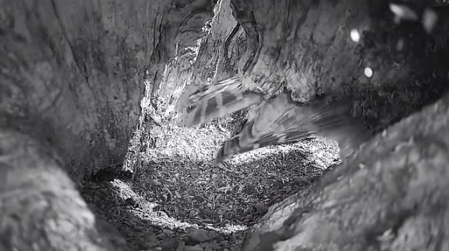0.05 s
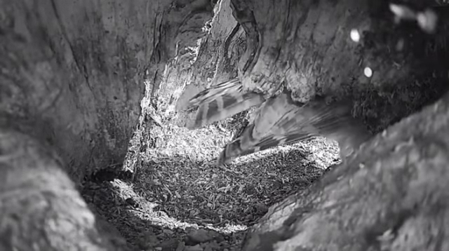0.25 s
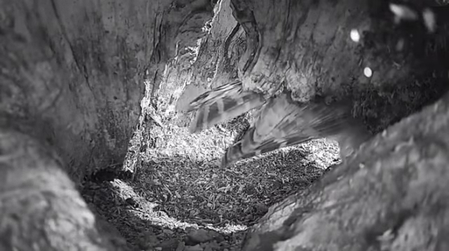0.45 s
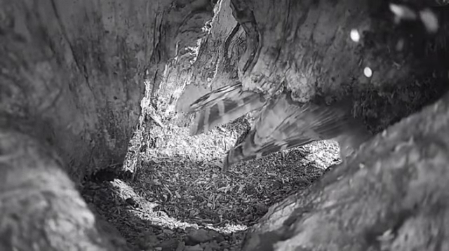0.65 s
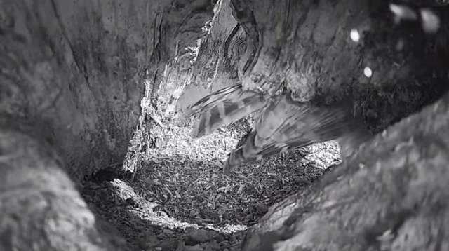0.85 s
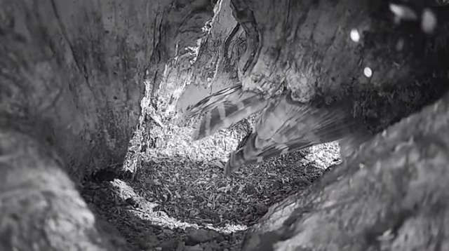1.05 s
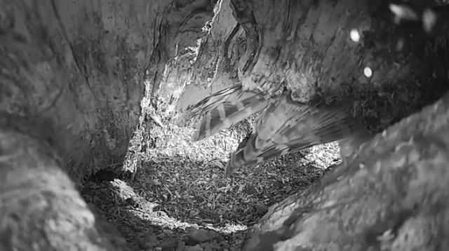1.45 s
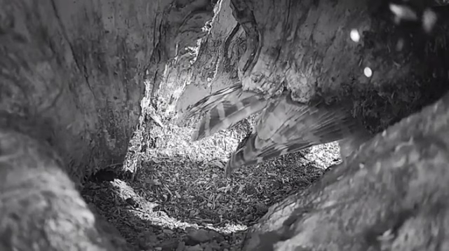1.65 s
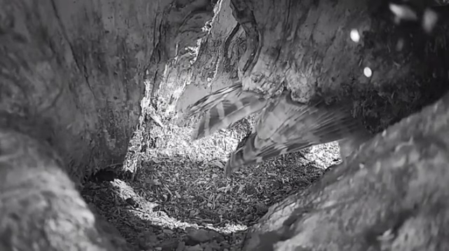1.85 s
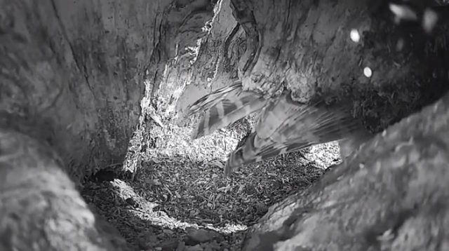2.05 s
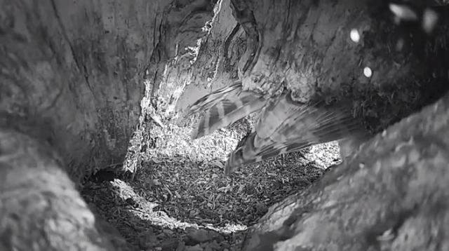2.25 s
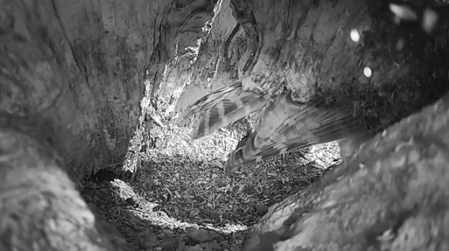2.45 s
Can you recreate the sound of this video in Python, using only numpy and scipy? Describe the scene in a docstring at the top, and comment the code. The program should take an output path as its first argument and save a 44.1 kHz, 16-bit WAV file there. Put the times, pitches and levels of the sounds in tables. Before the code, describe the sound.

One soft hoot among faint bird chirps, with low wind thumps and rumble.

```python
"""One soft hoot among the chirps of small birds, heard from a tree hollow in a woodland.
The hoot is a nearly pure tone arching in pitch and level. The chirps are short pitch glides,
blurred by trunks and leaves. Puffs of wind thump at the microphone over a low rumble;
behind them are a faint hoarse call, a light breeze and a distant hush."""
import sys
import numpy as np
from scipy import signal
from scipy.fft import rfft, irfft
from scipy.io import wavfile
from scipy.ndimage import uniform_filter1d

SR = 44100
rng = np.random.default_rng(int(sys.argv[2]) if len(sys.argv) > 2 else 0)


def pcm_store(signal):
    """Save signal as 16-bit PCM."""
    levels = np.round(np.clip(np.atleast_2d(signal), -1, 1) * 32767)
    wavfile.write(sys.argv[1], SR, levels.astype(np.int16).T)


N = 110250
TIME_S = np.arange(N) / SR


def amp(db):
    """Decibels to gain."""
    return 10 ** (np.asarray(db) / 20)


def unit_rms(x):
    """Scale to unit rms."""
    return x / np.sqrt(np.mean(x ** 2) + 1e-20)


def add(mix, start_s, sound):
    """Mix a sound in at start_s, cropped to fit."""
    at = round(start_s * SR)
    sound = sound[max(-at, 0):]
    part = mix[max(at, 0):][:len(sound)]
    part += sound[:len(part)]


def rolloff(ratio, order):
    """Filter gain: 1 at ratio 0, one half at ratio 1."""
    return 1 / (1 + ratio ** order)


def noise(gain_at, size):
    """Unit-rms noise with spectrum gain_at(hz)."""
    hz = np.fft.rfftfreq(size, 1 / SR) + 1
    return unit_rms(irfft(rfft(rng.standard_normal(size)) * gain_at(hz), size))


def drifting_noise(spectrum, drift_db):
    """Unit-rms noise whose level drifts in small time-frequency patches."""
    hz, _, bins = signal.stft(rng.standard_normal(N), SR, nperseg=2048, noverlap=1536)
    drift = uniform_filter1d(rng.standard_normal(bins.shape), size=12, axis=0)
    drift = unit_rms(uniform_filter1d(drift, size=6, axis=1))
    freq_hz, gain_db = np.transpose(spectrum)
    shape_db = np.interp(np.log(hz + 1), np.log(freq_hz), gain_db)
    bins = bins * amp(shape_db[:, None] + drift_db * drift)
    return unit_rms(signal.istft(bins, SR, nperseg=2048, noverlap=1536)[1][:N])


def echoes(sound, t60_s):
    """Dense reflections: convolution with a decaying noise tail of unit energy."""
    t = np.arange(SR) / SR
    tail = (rng.standard_normal(SR) * np.exp(-np.log(1000) * t / t60_s))[:int(t60_s * SR)]
    return signal.fftconvolve(sound, tail / np.linalg.norm(tail))[:N]


def swell(peak_s, half_width_s):
    """Gaussian envelope, 1/e at half_width_s from the peak."""
    return np.exp(-((TIME_S - peak_s) / half_width_s) ** 2)


def pitch_curve(length_s, first_hz, middle_hz, last_hz):
    """Parabola through three pitches."""
    parabola = np.polyfit([0, .5, 1], [first_hz, middle_hz, last_hz], 2)
    return np.polyval(parabola, np.linspace(0, 1, int(length_s * SR)))


# Hush spectrum: freq_hz, gain_db
HUSH_SPECTRUM = [(100, -3.5), (350, -1), (750, 5), (1000, 1.5), (1300, 2), (1700, -4), (2150, -9),
                 (2800, -6.5), (3400, -13), (4200, -21.5), (5200, -26), (7700, -32), (8400, -22.5),
                 (15000, -20.5), (20000, -36)]
# Hush envelope: time_s, gain_db
HUSH_ENVELOPE = [(0, -3.5), (.7, 1.5), (1.5, 0), (2.5, -2.5)]


def hush(level_db=-64):
    """Distant broadband hush, slowly rising and falling."""
    gain_db = np.interp(TIME_S, *np.transpose(HUSH_ENVELOPE))
    return amp(level_db + gain_db) * drifting_noise(HUSH_SPECTRUM, drift_db=2)


def breeze(level_db=-59, edge_hz=310):
    """One dull swell of air moving in the trees."""
    air = noise(lambda hz: rolloff(hz / edge_hz, 2) * rolloff(hz / (4 * edge_hz), 4), N)
    return amp(level_db) * swell(peak_s=0.5, half_width_s=0.2) * air


# Rumble spectrum: freq_hz, gain_db
RUMBLE_SPECTRUM = [(15, 0.5), (35, 3.5), (60, 0), (120, -12), (180, -11.5), (260, -25.5), (400, -32),
                   (900, -69)]


def rumble(level_db=-48.5):
    """Steady low noise of moving air."""
    return amp(level_db) * drifting_noise(RUMBLE_SPECTRUM, drift_db=1)


# Wind puffs: peak_s, width_s, level_db, upper_edge_hz
WIND_PUFFS = [(0.025, 0.016, -44, 110), (0.244, 0.029, -41.5, 75), (0.304, 0.061, -41.5, 75),
              (0.36, 0.029, -34, 105), (0.467, 0.029, -40, 110), (0.569, 0.028, -26.5, 78.7),
              (.755, 0.017, -40, 150), (0.801, 0.03, -23.5, 75.8), (0.851, 0.016, -36, 83.6),
              (0.939, 0.017, -43, 70), (1.034, 0.052, -40.5, 60), (1.224, 0.017, -31.5, 62.5),
              (1.283, 0.026, -42.5, 110), (1.494, 0.02, -39.5, 50), (1.558, 0.036, -41.5, 65),
              (1.649, 0.039, -42, 85), (1.748, 0.027, -44.5, 90), (1.857, 0.044, -39.5, 135),
              (1.933, 0.013, -27.5, 116.5), (1.957, 0.035, -30.5, 86), (2.226, 0.02, -37.5, 104)]


def wind_puffs(low_edge_hz=31.5, fine_edge_hz=250, fine_db=-22.5):
    """Brief low turbulence at the microphone, with fine eddies on top."""
    out = np.zeros(N)
    t = np.arange(SR // 2) / SR - 0.25
    for peak_s, width_s, level_db, upper_edge_hz in WIND_PUFFS:
        eddies = noise(lambda hz: rolloff(low_edge_hz / hz, 3) * rolloff(hz / upper_edge_hz, 4.13), len(t))
        fine_eddies = amp(fine_db) * noise(lambda hz: rolloff(hz / fine_edge_hz, 6), len(t))
        puff = (eddies + fine_eddies) * np.exp(-2 * (t / width_s) ** 2)
        puff *= np.sqrt(width_s * SR / np.sum(puff ** 2))
        add(out, peak_s + t[0], amp(level_db) * puff)
    return out


def hoarse_call(level_db=-65, centre_hz=800, half_band_hz=170):
    """Short toneless call, barely above the hush."""
    band = noise(lambda hz: rolloff((hz - centre_hz) / half_band_hz, 4), N)
    return amp(level_db) * swell(peak_s=1.492, half_width_s=0.04) * band


def chirp(pitch_hz, level_db, blur, peak_delay=0.4, flutter_hz=230, rate_hz=260):
    """Gliding tone; blur (0-1) adds pitch flutter and scatter off trunks and leaves."""
    progress = np.linspace(0, 1, len(pitch_hz))
    envelope = abs(np.sin(np.pi * progress ** (1 + peak_delay))) ** 0.43
    flutter = noise(lambda hz: rolloff(rate_hz / 2 / hz, 2) * rolloff(hz / rate_hz, 4), SR // 4)
    pitch_hz = pitch_hz + flutter_hz * blur * flutter[:len(pitch_hz)]
    tone = np.sqrt(2) * envelope * np.sin(2 * np.pi * np.cumsum(pitch_hz) / SR)
    heard = echoes(tone, t60_s=0.13)
    heard *= np.sqrt(blur) * np.linalg.norm(tone) / np.linalg.norm(heard)
    add(heard, 0, np.sqrt(1 - blur) * tone)
    return amp(level_db) * heard * np.linalg.norm(tone) / np.linalg.norm(heard)


# Short notes: start_s, length_s, first_hz, middle_hz, last_hz, level_db, blur
BIRD_NOTES = [ (0.05, 0.055, 2590, 2730, 2550, -65.5, 0.42), (0.07, 0.038, 3810, 3948, 3580, -59.5, 0.08),
              (.135, 0.024, 3020, 3175, 3570, -68.5, 0.74), (0.155, 0.027, 2880, 2770, 2614, -62.5, 0.57),
              (0.387, 0.026, 4020, 4094, 3910, -61.5, 0.21), (0.398, 0.051, 2507, 2560, 2560, -70.5, .1),
              (.24, 0.044, 2930, 2730, 2540, -71, .9), (0.411, 0.018, 2890, 3030, 3380, -64, 0.67),
              (0.502, .042, 5020, 4935, 4880, -70, 0.3), (.572, 0.035, 5100, 5220, 5130, -68.5, 0),
              (0.588, .045, 4926, 4620, 4030, -58.5, 0.38), (.622, .024, 4217, 4200, 4680, -60, .3),
              (0.658, 0.037, 3310, 3840, 3560, -54.5, 0.34), (0.681, 0.088, 2543, 2520, 2370, -70.5, 0.2),
              (0.713, 0.032, 1780, 1812, 1820, -66, 0.2), (0.801, 0.029, 4280, 4290, 4290, -65.5, 0.3),
              (0.832, 0.034, 7600, 7790, 7920, -70.5, 0.2), (0.821, 0.041, 6150, 6230, 6100, -66, 0.1),
              (1, 0.044, 3590, 3270, 3130, -66, 0.32), (1.01, 0.045, 1776, 1890, 2020, -67.5, 0.25),
              (1.111, 0.04, 4640, 4726, 4580, -67, 0.13), (1.216, 0.028, 4290, 4040, 4140, -61.5, 0.19),
              (1.258, 0.026, 3440, 3370, 3250, -67.5, 0.53), (1.240, .11, 7800, 6250, 4960, -87.5, 0.84),
              (1.439, 0.067, 4350, 4060, 3700, -75, 0.8), (1.489, 0.042, 3760, 3560, 3350, -57.5, 0.23),
              (1.498, 0.047, 4800, 4750, 4500, -76.5, 0.21), (1.537, 0.04, 1840, 1937, 1900, -69, 0.18),
              (1.602, 0.018, 4600, 4580, 4400, -83, 0.3), (1.737, 0.054, 4720, 4590, 4680, -81.5, 0.3),
              (1.823, 0.061, 4160, 4080, 4050, -78, 0.7), (1.897, 0.032, 4280, 3916, 3560, -63, 0.64),
              (1.933, .06, 3470, 3537, 3350, -70, 0.83), (2.044, 0.021, 4720, 4760, 4370, -78.5, 0.2),
              (2.155, 0.042, 3270, 3408, 3280, -60.5, 0.5), (0.193, 0.015, 4030, 4400, 4730, -80, 0.6),
              (2.406, .038, 4100, 5600, 3900, -85.5, .2)]
# Rising whistles: start_s, length_s, first_hz, middle_hz, last_hz, level_db, blur
BIRD_WHISTLES = [(0.769, .088, 2272, 2883, 3176, -53, 0.61), (1.069, 0.093, 2240, 2913, 3100, -53, 0.41)]
# Fast warbles: start_s, length_s, centre_hz, swing_hz, rate_hz, level_db, blur
BIRD_WARBLES = [(0.427, 0.1, 3290, 495, 60, -67.5, 0.6), (0.495, 0.037, 3264, 400, 140, -56, 0.5),
                (0.794, 0.044, 6430, 738, 61, -60, 0.6), (2.434, 0.019, 5870, 152, 104, -64, 0.11)]
# Two-part calls of a far bird: start_s, level_db
FAR_CALLS = [(1.654, -64.5), (1.757, -66), (1.860, -64), (1.974, -65.5), (2.075, -66.5), (2.187, -64.5),
             (2.301, -69.5), (2.408, -68)]


def songbirds(echo_db=-14, leaf_cutoff_hz=4760):
    """Small birds and the echo of the wood; leaves absorb the echo's treble."""
    songs = np.zeros(N)
    for start_s, *curve, level_db, blur in BIRD_NOTES:
        add(songs, start_s, chirp(pitch_curve(*curve), level_db, blur))
    for start_s, *curve, level_db, blur in BIRD_WHISTLES:
        add(songs, start_s, chirp(pitch_curve(*curve), level_db, blur, peak_delay=0.27))
    for start_s, length_s, centre_hz, swing_hz, rate_hz, level_db, blur in BIRD_WARBLES:
        t = np.arange(0, length_s, 1 / SR)
        pitch_hz = centre_hz + swing_hz * np.cos(2 * np.pi * rate_hz * t)
        add(songs, start_s, chirp(pitch_hz, level_db, blur))
    rise_hz = np.linspace(2488, 3096, int(0.022 * SR))
    held_hz = np.full(len(rise_hz) // 2, 3020)
    for start_s, level_db in FAR_CALLS:
        add(songs, start_s, chirp(rise_hz, level_db, blur=0.42))
        add(songs, start_s + 0.03, chirp(held_hz, level_db - 3.5, blur=0.42))
    leaves = signal.butter(4, leaf_cutoff_hz, fs=SR, output="sos")
    return songs + amp(echo_db) * signal.sosfilt(leaves, echoes(songs, t60_s=0.53))


def hoot(start_s=1.138, length_s=0.12, level_db=-38):
    """Nearly pure tone arching in pitch and level, with slight buzz, rasp and a faint echo."""
    buzz_hz, buzz_depth = 165.8, 0.08
    rasp_hz, rasp_half_band_hz, rasp_db = 501, 236, -14.5
    scatter_db, echo_db = -18, -17.5
    pitch_hz = pitch_curve(length_s, first_hz=439.6, middle_hz=494.1, last_hz=427)
    t = np.arange(len(pitch_hz)) / SR
    tone = np.sqrt(2) * np.sin(2 * np.pi * np.cumsum(pitch_hz) / SR)
    buzz = 1 + buzz_depth * np.sin(2 * np.pi * buzz_hz * t)
    rasp = noise(lambda hz: rolloff((hz - rasp_hz) / rasp_half_band_hz, 4), SR)[:len(t)]
    envelope = abs(np.sin(np.pi * t / length_s)) ** 0.85
    out = np.zeros(N)
    add(out, start_s, amp(level_db) * envelope * (tone * buzz + amp(rasp_db) * rasp))
    out += amp(scatter_db) * echoes(out, t60_s=0.3)
    return out + amp(echo_db) * echoes(out, t60_s=0.85)


def scene():
    """Hush, birds and wind at one microphone."""
    return (hush() + songbirds() + hoot() + hoarse_call() + rumble() + wind_puffs() + breeze())[None]


def record(dry):
    """Recorder band limit: a treble shelf cut."""
    edge_hz, shelf_db = 8000, -20
    lowpass = signal.firwin(511, edge_hz, window=("kaiser", 9), fs=SR)
    padded = np.pad(dry, ((0, 0), (255, 255)), mode="reflect", reflect_type="odd")
    low = signal.oaconvolve(padded, lowpass[None], "valid")
    return low + amp(shelf_db) * (dry - low)


dry = scene()
out = record(dry)
pcm_store(out)
```